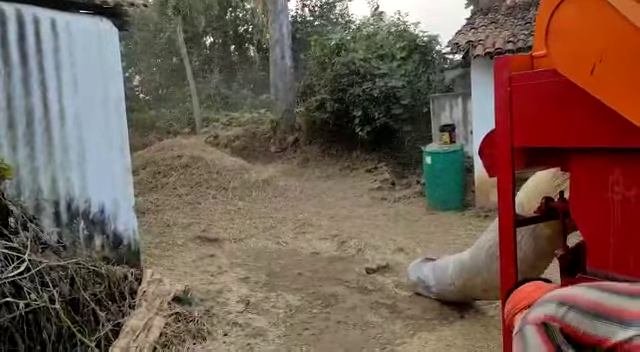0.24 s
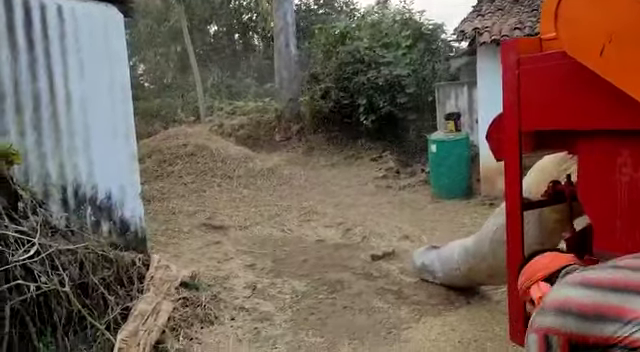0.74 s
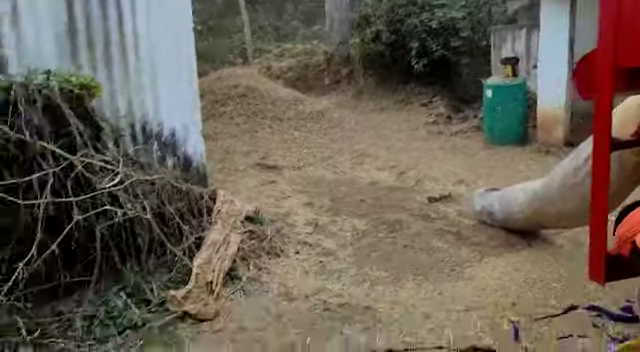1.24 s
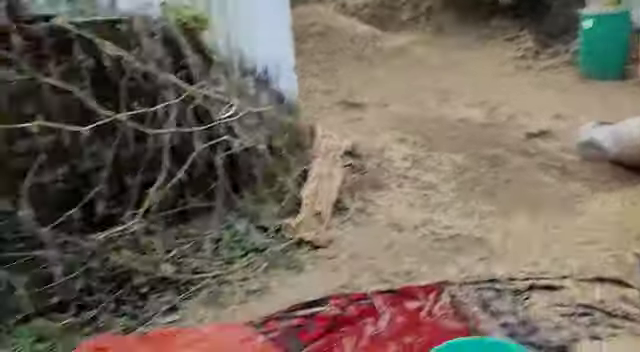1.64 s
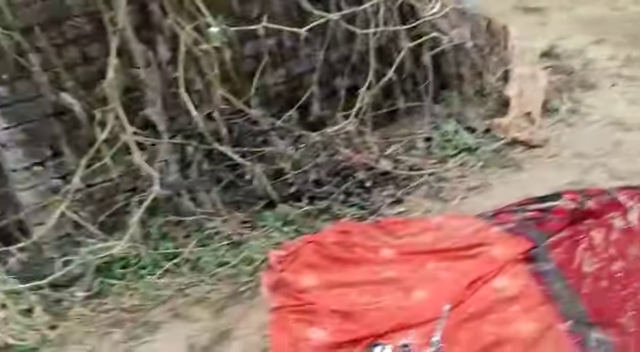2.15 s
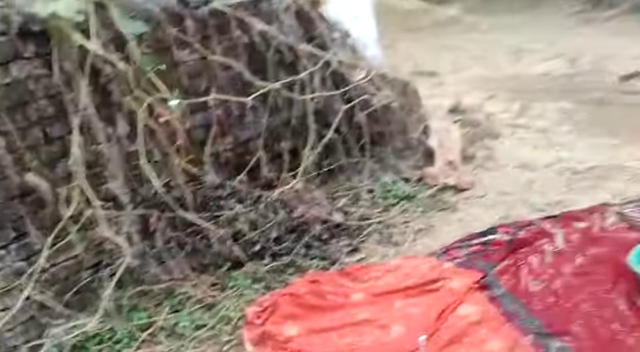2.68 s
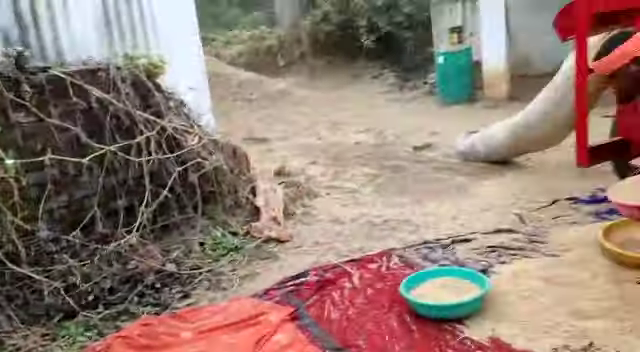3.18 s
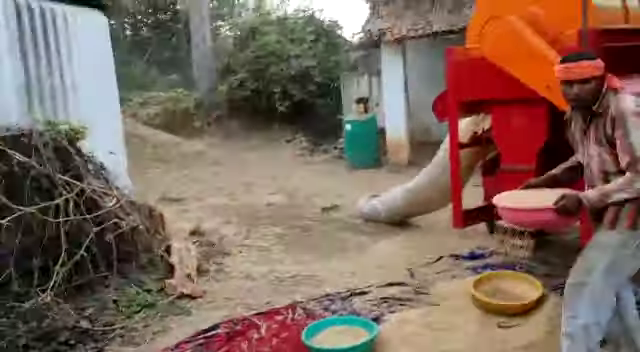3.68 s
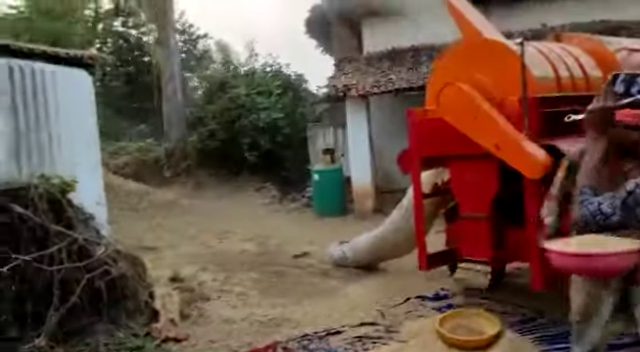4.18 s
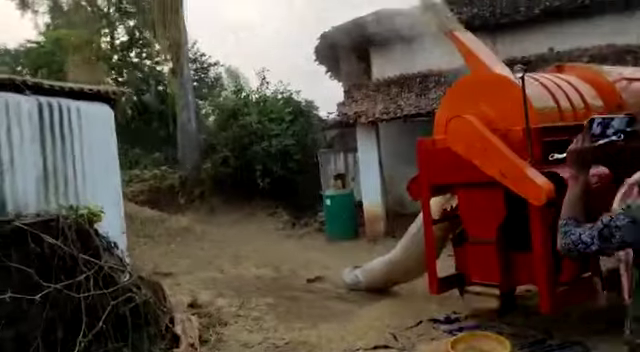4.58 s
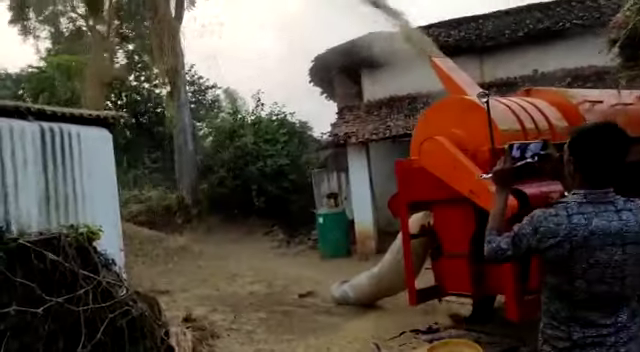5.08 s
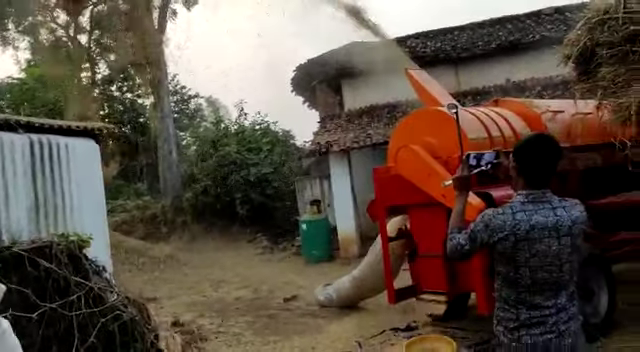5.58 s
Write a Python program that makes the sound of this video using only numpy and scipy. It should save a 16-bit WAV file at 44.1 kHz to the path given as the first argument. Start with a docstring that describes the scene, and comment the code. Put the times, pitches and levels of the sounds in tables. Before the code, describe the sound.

Continuous machine noise outdoors: a dense rush of straw, grain and chaff over a low engine drone, drum hum and roaring blower. The hiss is wide and leans left. It dips near two seconds as the low drone rises, flares near three, and then recedes while engine pitch bends down and recovers. Tiny chaff scrapes dot the walking, close microphone's view; no voices.

```python
"""A tractor-driven grain thresher runs in a farmyard while the microphone is carried about beside it.
It opens on strong sieve hiss over a faint diesel; the drum's belt-driven hum peaks in the first second.
Near 2 s the blower's rumble swells, the firing note comes up and the chaff spout's hollow note drops out.
The hiss jumps near 3.1 s; at 3.4 s a load sags the engine most, bending its orders and the drum's together.
It ends on diesel and thinner, brighter hiss; brief chaff spurts, shaped from noise, dot the whole walk."""
import sys
import numpy as np
from scipy import signal
from scipy.fft import rfft, irfft, next_fast_len
from scipy.io import wavfile
from scipy.ndimage import uniform_filter1d, map_coordinates

SR = 44100
rng = np.random.default_rng(int(sys.argv[2]) if len(sys.argv) > 2 else 0)


def int16_out(signal):
    """Quantize to a 16-bit WAV file."""
    q = np.round(np.clip(np.atleast_2d(signal).T, -1, 1) * 32767)
    wavfile.write(sys.argv[1], SR, q.astype(np.int16))


N = 257103

# Spurts of chaff: start_s (the peak), level_db, centre_hz, width_s
CHAFF_SPURTS = [(1.149, -26, 4000, 0.0045), (2.202, -31, 3810, .008), (2.735, -30, 6500, 0.014),
                (3.058, -35, 7000, 0.019), (3.44, -39, 10500, .01), (4.1, -30, 5200, 0.0097),
                (5.614, -38, 13500, .01)]

# Tone colour of each noise layer: pitch_hz, level_db
RUMBLE_COLOUR = [(20, -28), (33, -25), (55, -2.5), (90, 0), (140, 1.5), (200, 1), (290, -1), (400, -3.5),
                 (500, -4.5), (700, -14.5), (1400, -55)]
ROAR_COLOUR = [(250, -16.5), (420, -9.5), (520, -1), (640, -0.5), (790, -4), (1000, -5), (1250, -7),
               (1600, -10), (2300, -15), (5000, -40)]
SPOUT_COLOUR = [(400, -36), (545, -15), (590, 0), (622, 4.5), (660, -13), (850, -48)]
STRAW_COLOUR = [(700, -7), (1300, -3), (1750, -3), (2200, 0), (2900, -2.5), (3600, -1.5), (4500, -5),
                (5500, -8.5), (9000, -51), (16000, -60)]
GRAIN_COLOUR = [(3000, -25), (4600, -12.5), (5300, -3), (6000, -1), (6600, -0.5), (7500, -4.5), (8500, -15),
                (10000, -30), (16000, -55)]
HUSK_COLOUR = [(5500, -29), (7500, -4), (8400, 0.5), (9300, -3), (10700, -5), (12000, -14), (16000, -34)]
DUST_COLOUR = [(6000, -30), (10000, -6), (11200, 0.5), (12500, 0.5), (15800, -2.5)]

# Likeness of the two microphone ports: pitch_hz, correlation (0 to 1)
PORT_LIKENESS = [(40, 0.66), (170, 1), (300, 0.78), (450, 0.77), (650, 1), (900, 0.27), (1600, 0.62),
                 (2400, 0.27), (4000, 0.14), (6000, 0.049), (16000, .03)]
# Shading of the right port from the hiss: pitch_hz, left_minus_right_db
PORT_SHADE = [(35, -2), (70, 3.5), (130, 0), (260, 0), (800, 0), (1300, 1), (2500, 2), (3600, 4), (4700, 3),
              (6100, 10), (7300, 6.5), (8500, 10.5), (13500, 11), (15800, 13)]
# Phase by which the left port leads: pitch_hz, lead_radians
PORT_LEAD = [(40, -1), (70, -.65), (130, -.4), (260, 0), (420, .25), (800, 0)]
# Bearing of the machine: time_s, left_lead_s
MACHINE_BEARING = [(0, .00032), (1.2, 0.00032), (2.2, 0.00047), (2.8, 0.00046), (3.4, .00028), (4, .00019),
                   (5.83, .00017)]
# How far the machine's front faces the microphone: time_s, share of hiss power (0 to 1)
FRONT_SHARE = [(0, 0.096), (3.2, 0.0066), (4.2, 0.33), (5.83, 1)]

# Sieve hiss before the grain's trim: time_s, level_db
SIEVE_HISS = [(0.0, -25), (0.1, -23.5), (0.63, -25.5), (0.92, -24), (1.7, -28), (2.34, -32), (2.68, -31),
              (3.09, -24), (3.1, -28.5), (3.18, -26.5), (4.03, -32), (4.64, -34.5), (5.83, -33)]
# Engine firing note before its trim: time_s, level_db
FIRING_NOTE = [(0.0, -31), (0.03, -28), (0.89, -30), (2.06, -15), (2.78, -14.5), (3.93, -22), (4.38, -18.5),
               (5.73, -19.5), (5.83, -19)]
# Other engine orders, faded evenly: crankshaft_multiple, start_level_db, end_level_db
ENGINE_ORDERS = [(2, -42, -34.5), (3, -33, -47), (4, -28, -23.5), (8, -31, -31), (10, -32, -33),
                 (12, -26, -35), (14, -30, -41.5), (16, -33, -51.5), (18, -41, -43)]
# Quiet or loud spots in an order's standing wave: crankshaft_multiple, time_s, change_db, width_s
STANDING_WAVE_SPOTS = [(4, 1.2, -16, .5), (8, 2.8, -13.5, 0.78), (8, 5.15, 5, 0.25), (10, 2.6, -7.5, 0.83),
                       (10, 4.94, 3, .3), (12, 5.1, -9, 0.29)]
# Drum orders: drum_multiple, peak_level_db, peak_s, rise_db_per_s, fall_db_per_s
DRUM_LINES = [(2, -38, 2.4, 6, 4), (4, -26.5, 0.83, 3, 3.5), (6, -22.5, .6, 17, 1.2)]
# Loads dragging the crankshaft down: time_s, lost_turns_per_s, width_s
ENGINE_LOADS = [(1.3, .42, .4), (3.45, 1.55, .95)]

FREE_TURNS_PER_S = 22.05  # unloaded crankshaft
BELT_RATIO = .824  # drum turns per crankshaft turn
RUMBLE_START_DB, RUMBLE_FADE_DB_PER_S = -21, 0.79
BODY_HZ, BODY_START_DB, BODY_FADE_DB_PER_S = 250, 1, .5  # extra level and fade above this pitch
SURGE_S, SURGE_WIDTH_S, SURGE_DB = 1.99, 0.16, 3.5  # the rumble swells once
ROAR_START_DB, ROAR_FADE_DB_PER_S = -26.5, 1.0
SPOUT_DB = -36
AWAY_S, AWAY_WIDTH_S, AWAY_LOSS_DB = 2.53, 0.25, 13  # spout note lost as the microphone turns away
HISS_FULL_DB = -24  # hiss level at which the layers that follow it stand at full_db
TOP_HZ = 15830


def amp(db):
    """Decibels to gain."""
    return 10 ** (np.asarray(db) / 20)


def unit(x):
    """Scale to rms 1."""
    return x / np.sqrt(np.mean(x ** 2) + 1e-20)


def along(points, hz):
    """Read a curve of (pitch, value) points on a log pitch axis."""
    f, v = np.transpose(points)
    return np.interp(np.log(hz + 1), np.log(f + 1), v)


def curve(rows):
    """Stretch (time, value) rows to one value per sample."""
    s, values = np.transpose(rows)
    return np.interp(np.arange(N) / SR, s, values)


def swell(s, width):
    """A bell of height 1 around a moment; width is its standard deviation in seconds."""
    return np.exp(-.5 * ((np.arange(N) / SR - s) / width) ** 2)


def fade(db_per_s, s=0):
    """Decibels lost evenly with the time from a moment, on either side."""
    return db_per_s * np.abs(np.arange(N) / SR - s)


def wobble(rate):
    """A smooth random curve, rate knots a second."""
    knots = rng.standard_normal(int(N * rate / SR) + 4)
    return map_coordinates(knots, [np.arange(N) * rate / SR])


def filtered(x, response):
    """Shape x by a complex response of frequency."""
    m = next_fast_len(N + SR // 4)
    spectrum = rfft(x, m) * response(np.fft.rfftfreq(m, 1 / SR))
    return irfft(spectrum, m)[..., :N]


def ports(pair, colour):
    """Two unrelated signals become a coloured field at the two microphone ports, rms 1 in the middle."""
    def mid_side(hz):
        turn = np.arccos(np.clip(along(PORT_LIKENESS, hz), -1, 1)) / 2
        return amp(along(colour, hz)) * [np.cos(turn), np.sin(turn)]

    def left_right(hz):
        left = amp(along(PORT_SHADE, hz) / 2) * np.exp(.5j * along(PORT_LEAD, hz))
        return np.array([left, 1 / left])

    mid, side = filtered(pair, mid_side)
    out = filtered(np.array([mid + side, mid - side]), left_right)
    return out / np.std(out.mean(axis=0))


def turbulence(patchy_db):
    """Two noises whose strength drifts together in patches of time and pitch."""
    z = signal.stft(rng.standard_normal((2, N)), nperseg=512)[2]
    field = rng.standard_normal(z.shape[1:])
    field = uniform_filter1d(field, size=9, axis=0)  # smooth over pitch
    field = uniform_filter1d(field, size=14, axis=1)  # smooth over time
    return signal.istft(z * amp(patchy_db * unit(field)), nperseg=512)[1][:, :N]


def impacts(rate, spread_db):
    """Tiny hits of uneven size, about rate a second in each channel."""
    hit = rng.random((2, N)) < rate / SR
    size = amp(spread_db * rng.standard_normal((2, N)))
    return unit(hit * rng.standard_normal((2, N)) * size)


def heard_from_machine(direct, echo, echo_db):
    """Direct sound follows the bearing; unrelated noise from the mirrored side stands for the yard wall."""
    shift = curve(MACHINE_BEARING) * SR / 2

    def advanced(x, by):
        return map_coordinates(x, [np.arange(N) + by], mode="mirror")

    left = advanced(direct[0], shift) + amp(echo_db) * advanced(echo[0], -shift)
    right = advanced(direct[1], -shift) + amp(echo_db) * advanced(echo[1], shift)
    return np.array([left, right]) / np.std((left + right) / 2)


def shaft_line(speed, level_db, order, flutter_db, jitter):
    """One order of a turning shaft as a sine, slightly unsteady in level and phase, at both ports."""
    turns = order * np.cumsum(speed) / SR + rng.random()
    phase = 2 * np.pi * turns + jitter * wobble(7)  # jitter in radians
    hz = order * speed.mean()
    half = np.array([[.5], [-.5]])  # left and right each take half the difference
    gain = amp(level_db + flutter_db * wobble(9) + half * along(PORT_SHADE, hz))
    return np.sqrt(2) * gain * np.sin(phase + half * along(PORT_LEAD, hz))


def crankshaft():
    """Turns a second: the engine sags under each load and recovers."""
    return FREE_TURNS_PER_S - sum(sag * swell(s, width) for s, sag, width in ENGINE_LOADS)


def spurts():
    """Each wad of chaff scrapes past as a short bell of noise peaking around one pitch."""
    out = np.zeros((2, N))
    for s, db, hz, width in CHAFF_SPURTS:
        colour = [(hz / 4, -50), (hz / 2, -13), (hz, 0), (hz * 1.3, -7), (hz * 2, -26), (hz * 4, -60)]
        out += amp(db) * swell(s, width) * ports(rng.standard_normal((2, N)), colour)
    return out


def with_hiss(full_db, follows, fade_db_per_s):
    """Gain of a layer that takes a share of the hiss's swings and recedes along the walk."""
    swing_db = curve(SIEVE_HISS) - HISS_FULL_DB
    return amp(full_db + follows * swing_db - fade(fade_db_per_s))


def sieve_hiss(brightening):
    """Grain patters on the steel sieves; seen from the front, the hiss sits a little higher."""
    front = np.clip(curve(FRONT_SHARE), 0, 1)

    def patter(colour):
        return ports(turbulence(patchy_db=0.0) + .6 * impacts(rate=5000, spread_db=4.5), colour)

    front_colour = [(hz * brightening, db) for hz, db in GRAIN_COLOUR]
    return np.sqrt(1 - front) * patter(GRAIN_COLOUR) + np.sqrt(front) * patter(front_colour)


def crop():
    """Straw rushes through the drum; grain, husks and dust hiss over the sieves as noise and tiny hits."""
    def stalks():
        return ports(turbulence(patchy_db=1.73) + .5 * impacts(rate=2500, spread_db=2.5), STRAW_COLOUR)

    straw = heard_from_machine(stalks(), stalks(), echo_db=-3.5)
    straw = with_hiss(full_db=-25.0, follows=0.54, fade_db_per_s=0.59) * straw
    grain = amp(curve(SIEVE_HISS) + 0.47) * sieve_hiss(brightening=1.087)
    husks = ports(turbulence(patchy_db=1.4) + .5 * impacts(rate=4000, spread_db=6.0), HUSK_COLOUR)
    husks = with_hiss(full_db=-32.0, follows=0.72, fade_db_per_s=0.13) * husks
    dust = ports(turbulence(patchy_db=1.0) + .3 * impacts(rate=4000, spread_db=5), DUST_COLOUR)
    dust = with_hiss(full_db=-36.5, follows=.3, fade_db_per_s=1.5) * dust
    feed_db = 0.31 * wobble(22.04)  # the crop passes in uneven wads
    return amp(feed_db) * (straw + grain + husks + dust)


def blower_rumble():
    """Churned air rumbles in the steel housing, swells once and recedes, its upper body faster."""
    level_db = RUMBLE_START_DB - fade(RUMBLE_FADE_DB_PER_S) + SURGE_DB * swell(SURGE_S, SURGE_WIDTH_S)
    churn = ports(turbulence(patchy_db=0.5), RUMBLE_COLOUR)
    deep = filtered(churn, lambda hz: 1 / (1 + (hz / BODY_HZ) ** 4))
    body = amp(BODY_START_DB - fade(BODY_FADE_DB_PER_S)) * (churn - deep)
    return amp(level_db + 0.35 * wobble(13)) * (deep + body)


def blower_roar():
    """Turbulent air roars out of the housing and slowly recedes."""
    def air():
        return ports(turbulence(patchy_db=1.1), ROAR_COLOUR)

    level_db = ROAR_START_DB - fade(ROAR_FADE_DB_PER_S) + .4 * wobble(9.1)
    return amp(level_db) * heard_from_machine(air(), air(), echo_db=-6.0)


def chaff_spout():
    """Blown air rings the spout: narrow-band noise that drops out as the microphone turns away."""
    level_db = SPOUT_DB - AWAY_LOSS_DB * swell(AWAY_S, AWAY_WIDTH_S)
    return amp(level_db) * ports(turbulence(patchy_db=2.0), SPOUT_COLOUR)


def drum():
    """The belt turns the drum at a fixed share of the engine's speed, so the two hums beat."""
    t, hum = np.arange(N) / SR, np.zeros((2, N))
    speed = BELT_RATIO * crankshaft()
    for multiple, db, s, rise, fall in DRUM_LINES:
        level_db = db - fade(np.where(t < s, rise, fall), s)
        hum += shaft_line(speed, level_db, order=multiple, flutter_db=0.1, jitter=0.22)
    return hum


def engine():
    """The exhaust drone; its orders swell and fade as the microphone moves between the walls."""
    speed = crankshaft()
    drone = shaft_line(speed, curve(FIRING_NOTE) - .5, order=6, flutter_db=.5, jitter=.06)
    for multiple, start_db, end_db in ENGINE_ORDERS:
        level_db = np.linspace(start_db, end_db, N)
        for spot_multiple, s, change_db, width in STANDING_WAVE_SPOTS:
            if spot_multiple == multiple:
                level_db += change_db * swell(s, width)
        drone += shaft_line(speed, level_db, order=multiple, flutter_db=1.0, jitter=.1)
    return drone


def scene():
    """The whole machine in the open yard."""
    blower = blower_rumble() + blower_roar() + chaff_spout()
    return spurts() + crop() + blower + drum() + engine()


def record(dry):
    """The recorder keeps nothing above its band limit."""
    return filtered(dry, lambda hz: hz < TOP_HZ)


dry = scene()
out = record(dry)
int16_out(out)
```